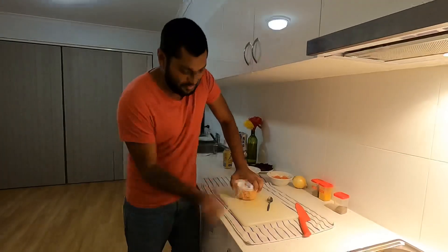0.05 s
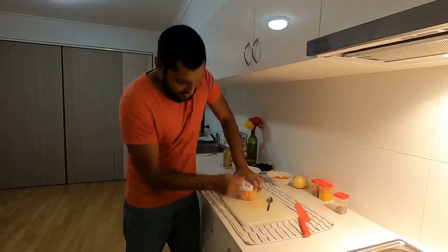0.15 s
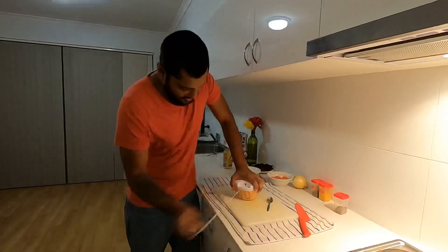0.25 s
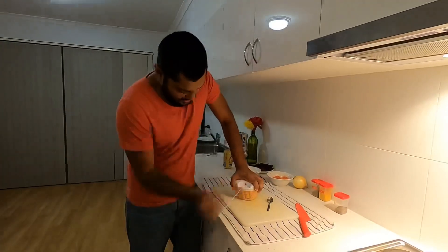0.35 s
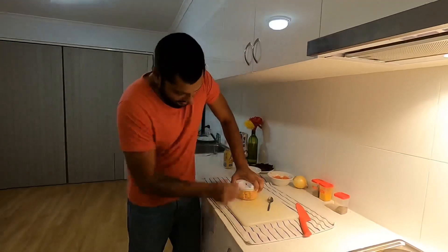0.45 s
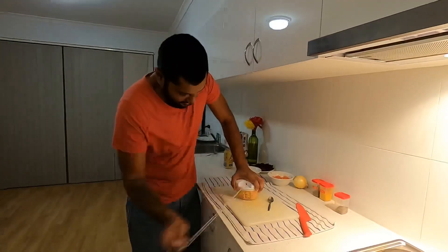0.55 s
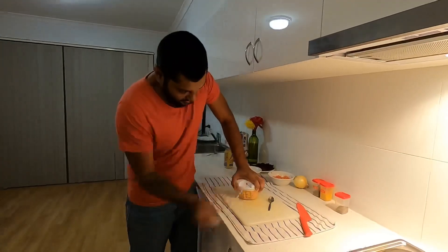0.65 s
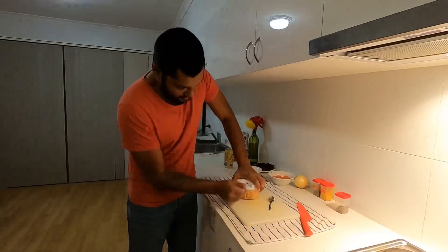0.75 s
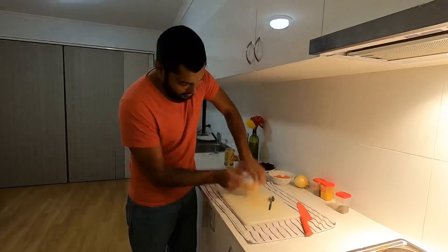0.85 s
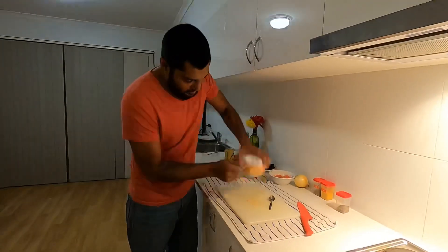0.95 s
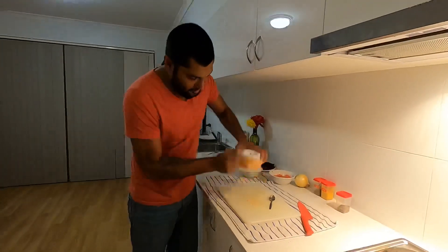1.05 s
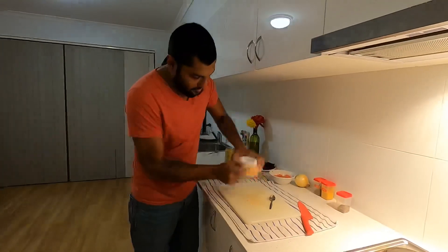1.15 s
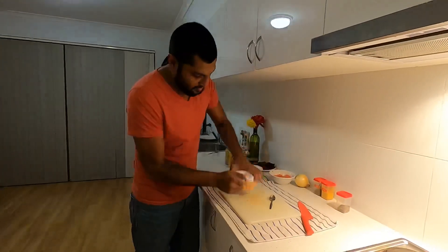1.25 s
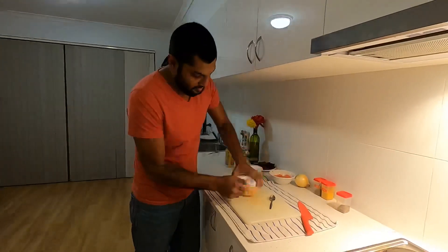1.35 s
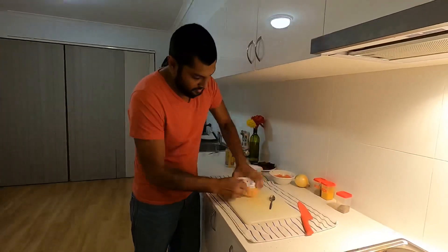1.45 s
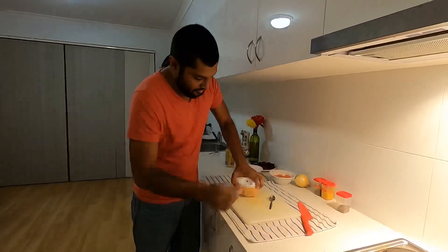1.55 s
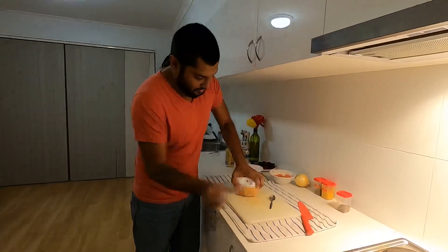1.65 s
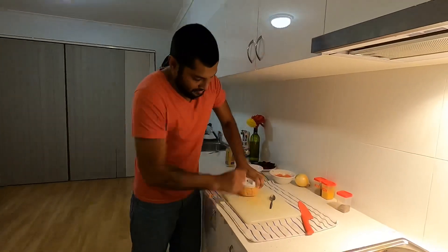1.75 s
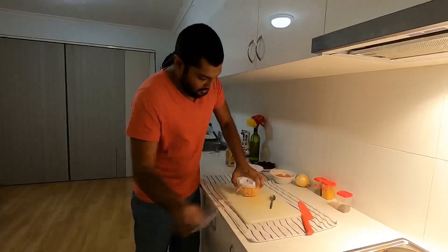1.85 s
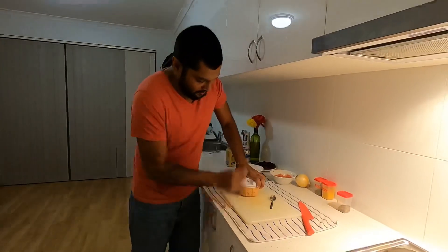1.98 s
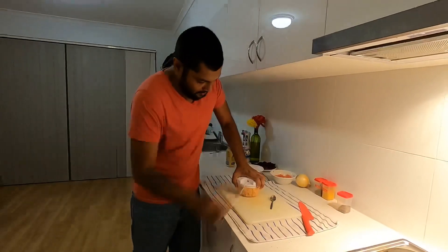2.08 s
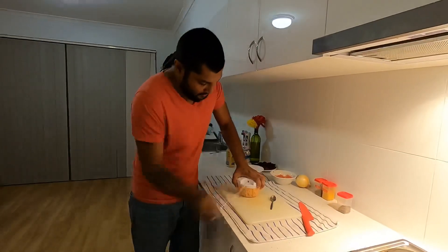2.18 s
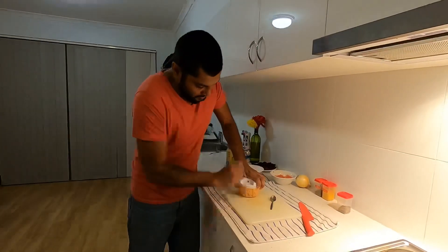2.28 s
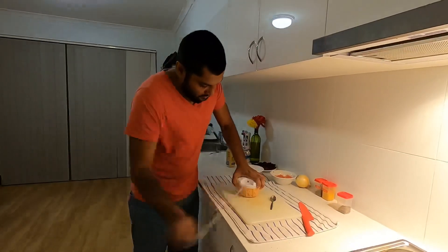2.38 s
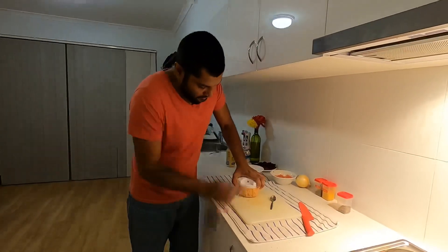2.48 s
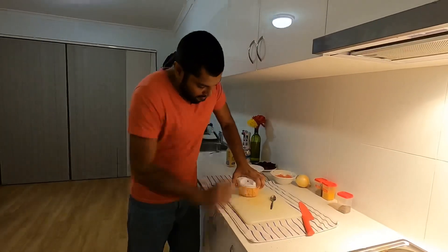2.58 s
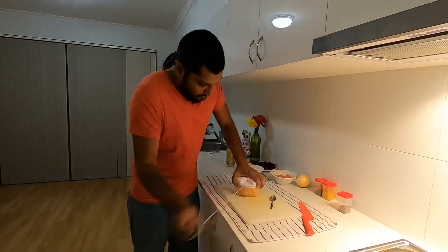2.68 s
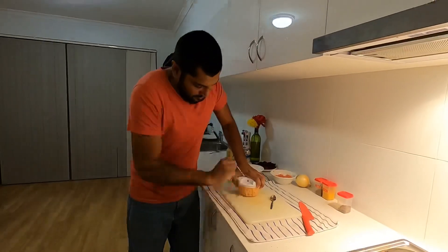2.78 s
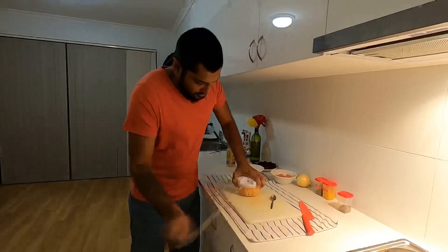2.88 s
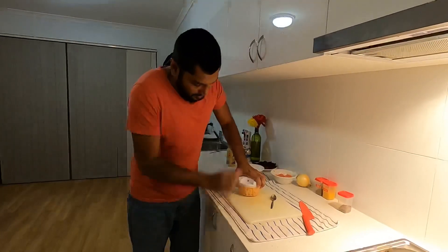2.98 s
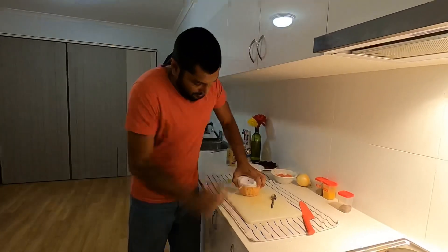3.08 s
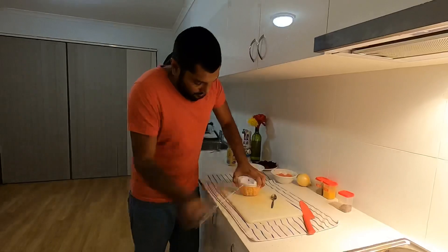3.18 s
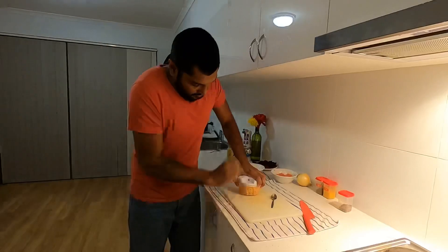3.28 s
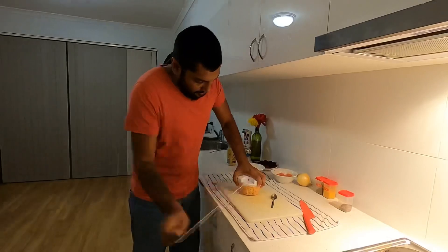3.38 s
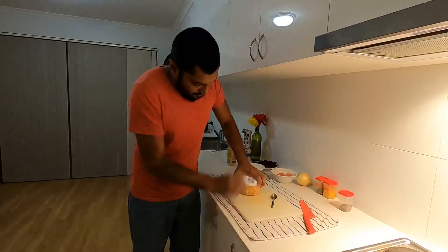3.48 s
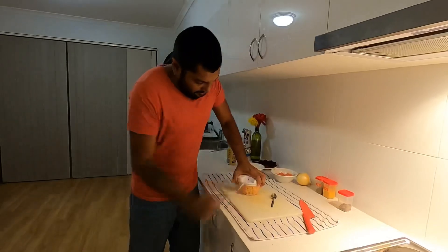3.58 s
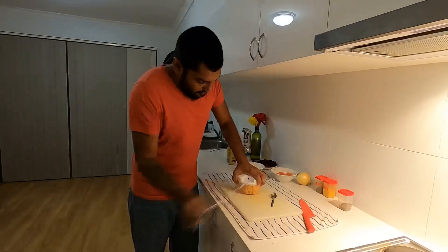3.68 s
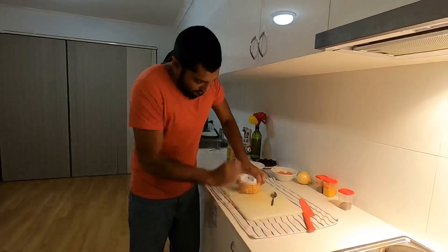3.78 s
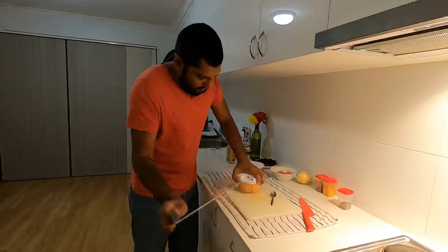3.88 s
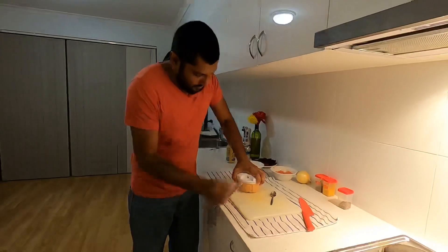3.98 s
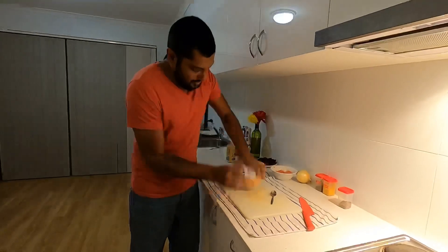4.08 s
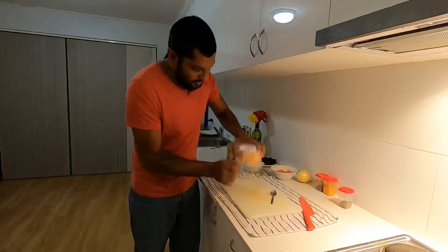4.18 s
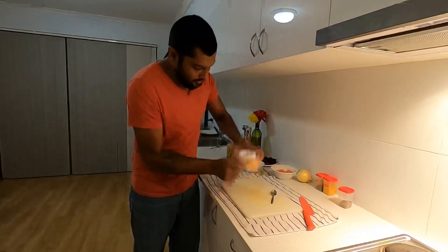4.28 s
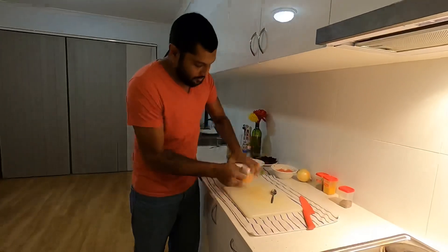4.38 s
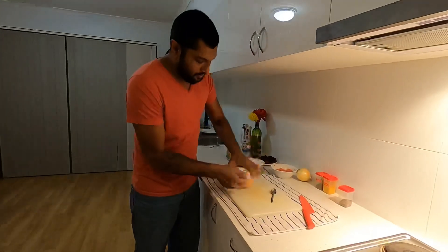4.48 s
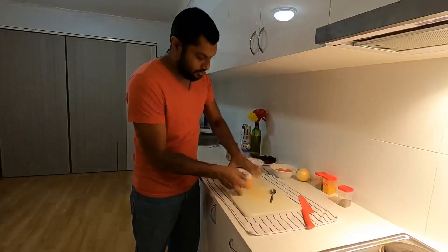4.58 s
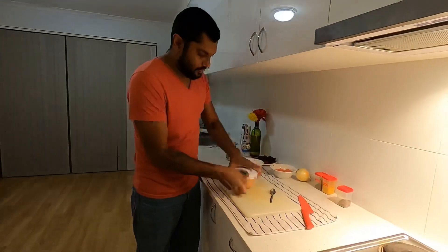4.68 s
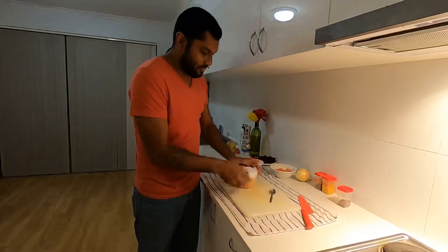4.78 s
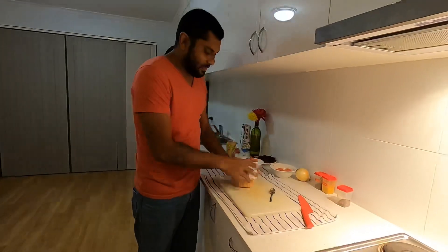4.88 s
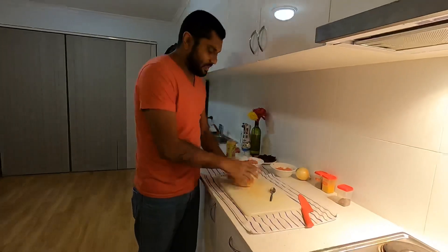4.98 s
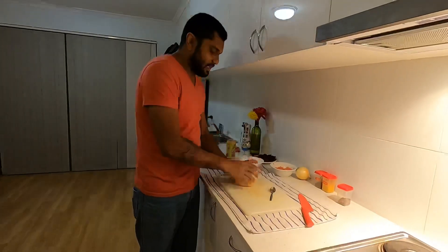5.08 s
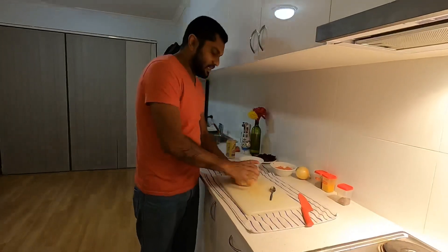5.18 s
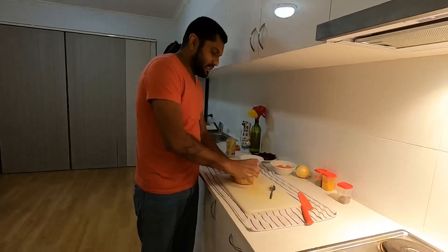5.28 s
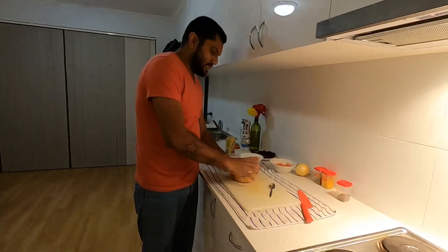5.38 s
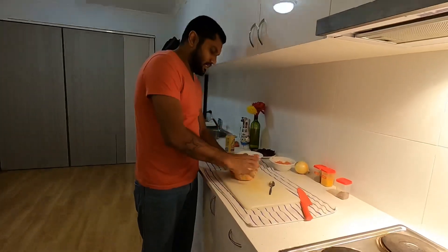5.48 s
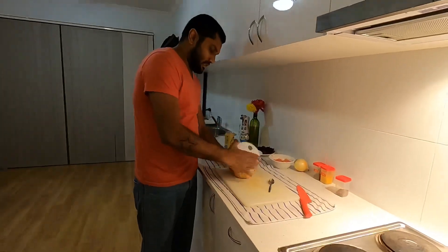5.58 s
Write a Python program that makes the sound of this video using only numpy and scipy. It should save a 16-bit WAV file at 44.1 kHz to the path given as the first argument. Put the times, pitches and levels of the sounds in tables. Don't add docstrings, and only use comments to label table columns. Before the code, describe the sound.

In a small hard kitchen, a pull-cord food chopper is yanked three times, its gears rasping and ratchet clattering. The bowl is shaken and set down, then about ten fast pulls follow at four per second. After another shake, it lands with a hard knock, the lid snaps, and faint rubbing remains. Stereo microphone about two metres away, short bright reverberation.

```python
import sys
import numpy as np
from scipy import signal
from scipy.fft import rfft, irfft, next_fast_len
from scipy.io import wavfile
from scipy.ndimage import uniform_filter1d

SR = 44100
rng = np.random.default_rng(int(sys.argv[2]) if len(sys.argv) > 2 else 0)


def dump_mix(stems):
    frames = np.atleast_2d(stems).T
    limited = np.clip(frames, -1, 1)
    pcm = np.round(limited * 32767).astype(np.int16)
    wavfile.write(sys.argv[1], SR, pcm)


def natural_amplitude(level_db):
    exponent = np.asarray(level_db, float) / 20
    return 10 ** exponent


N = 248879
T = np.arange(N) / SR
LONG = next_fast_len(N)


def on_log(hz, table):
    f, value = np.transpose(table)
    return np.interp(np.log(np.maximum(hz, 1)), np.log(f), value)


def ring(x, spectrum, modes=()):
    hz = np.arange(4097) * SR / 8192
    db = on_log(hz, spectrum)
    for f, width, lift in modes:
        db = db + lift / (1 + (2 * (hz - f) / width) ** 2)
    cepstrum = irfft(db * np.log(10) / 20)
    cepstrum[1:4096] *= 2
    cepstrum[4097:] = 0
    response = irfft(np.exp(rfft(cepstrum)))[:4096]
    return signal.fftconvolve(x, response / np.sqrt(np.sum(response ** 2)))[:N]


def band(x, lo_hz, hi_hz):
    return signal.sosfilt(signal.butter(2, [lo_hz, hi_hz], "bandpass", fs=SR, output="sos"), x)


def curve(spans, column):
    total = 0
    for span in spans:
        columns = np.transpose(span)
        total = total + natural_amplitude(np.interp(T, columns[0], columns[column], -150, -150))
    return total


def clicks(rate, scatter_db):
    hit, size, sign = rng.random((3, N))
    size_db = np.minimum(-scatter_db * np.log(1 - size), 11.0)
    x = (hit < rate / SR) * natural_amplitude(size_db) * np.sign(sign - .5)
    return x / np.sqrt(np.mean(x ** 2))


def strokes(start, db, rise_s, hold_s, fall_s):
    out = np.zeros(N + 2 * SR)
    u = np.arange(SR // 2) / SR
    for s, level, rise, hold, fall in np.broadcast(start, db, rise_s, hold_s, fall_s):
        i = int((s + 1) * SR)
        swell = np.clip(u / max(rise, .002), 0, 1) ** 2
        out[i:i + len(u)] += natural_amplitude(level) * swell * np.exp(-u / 0.28 - np.maximum(u - hold, 0) / fall)
    return out[SR:N + SR]


# (pitch [Hz], correlation [-1 to 1])
LIKENESS = [(60, 0.88), (130, 0.93), (290, 0.96), (640, 0.76), (1410, 0.58), (3100, 0.14), (6800, -0.22),
            (15000, 0.0016)]


def diffuse(size):
    mid, side = rfft(rng.standard_normal((2, size)))
    c = np.clip(on_log(np.arange(len(mid)) * SR / size, LIKENESS), -.9, .999)
    a, b = np.sqrt((1 + c) / 2) * mid, np.sqrt((1 - c) / 2) * side
    return irfft([a + b, a - b], size)


def drift(hold_s):
    k = int(hold_s * SR)
    return 0.94 * uniform_filter1d(np.repeat(rng.standard_normal(N // k + 1), k), k)[:N]


# (time [s], clatter [dB], length [s], pawl catch after [s], catch level [dB])
REWINDS = [(-0.03, -13, 0.079, .034, -40), (0.194, -18, 0.021, 0.0078, -20),
           (0.236, -16.5, 0.13, .006, -15), (0.492, -15.5, 0.073, 0.032, -12),
           (0.562, -18.5, 0.11, 0.021, -14.5), (1.535, -13.5, 0.13, 0.093, -14.5),
           (1.822, -12, 0.13, .019, -12.5), (2.126, -12, 0.052, 0.018, -17.5),
           (2.385, -12, 0.082, .023, -26), (2.625, -12.5, 0.097, .023, -48),
           (2.866, -12.5, 0.11, 0.045, -28), (3.129, -12, 0.062, .012, -18.5),
           (3.363, -13, 0.092, .012, -39), (3.624, -12.5, 0.075, .015, -17), (3.861, -13, 0.052, .02, -25)]
# (time [s], gear rasp level [dB], drum whistle level [dB], board wobble level [dB])
YANKS = [(0.0716, -14.5, -25.5, -15), (0.373, -17, -26, -28), (0.67, -16, -30, -55),
         (1.6977, -17, -29, -47), (1.963, -14.5, -42, -22), (2.228, -16.5, -27, -32),
         (2.497, -15, -36, -23), (2.7473, -15, -30.5, -20), (2.9891, -15.5, -31.5, -22),
         (3.2332, -16, -29.5, -27), (3.487, -15.5, -27.5, -21.5), (3.746, -14, -32, -12.5),
         (3.973, -18, -39, -41)]
# (pitch [Hz], level [dB per Hz])
BOWL = [(88, -25), (150, -6), (436, -7), (656, -6), (766, -8), (985, -0.5), (1660, -3), (1800, -1.5),
        (8830, -23), (15500, -38.5)]
# (pitch [Hz], width [Hz], lift [dB])
BOWL_MODES = [(231.5, 38, 7.8), (325, 66, 7.8), (497, 15, 2.9), (657, 156, 9), (845, 42, 6.2),
              (1025, 70, 5.9), (1200, 17, 0.79), (1870, 150, 4.5), (2170, 460, 1.33)]
# (pitch [Hz], level [dB per Hz])
GEARS = [(1500, -23.5), (2500, -7), (3550, -13), (4500, -4), (5500, -14), (7000, -13), (9000, -10),
         (10000, -21), (12500, -21), (15500, -75)]
# (pitch [Hz], width [Hz], lift [dB])
GEAR_MODES = [(3880, 130, 4), (4570, 100, 1.8), (6440, 94, 6), (7700, 530, 3.5)]
# (low edge [Hz], high edge [Hz])
SHIFTING_BANDS = [(520, 870), (850, 1230), (1650, 2250), (2400, 3220)]


def chopper():
    yank, back = np.transpose(YANKS), np.transpose(REWINDS)
    blades_db, ratchet_db = -27, -5
    rewind_rise_s = 0.0052 + 0.59 * back[3]

    def pull(db, fall_s):
        return strokes(yank[0], db, 0.014, 0.059, fall_s)

    def wind(db, fall_s):
        return strokes(back[0], back[1] + db, rewind_rise_s, back[2], fall_s)

    chops = signal.lfilter([1], [1, -np.exp(-1 / (0.0097 * SR))], np.abs(clicks(110, 23.0)))
    lumps = 1.13 + 0.24 * chops / np.mean(chops)

    rasp = ring(pull(yank[1] - 11, 0.031) * lumps * clicks(7000, 1.7), GEARS, GEAR_MODES)
    whistle = pull(yank[2] - 3, 0.043) * squeal()

    clutch = strokes(yank[0] + 0.0042, yank[1] - 20, 0.0027, 0.028, .012)
    clutch_zip = clutch * band(clicks(6700, 2.0), 6300.0, 16000.0)

    load = pull(blades_db - 5.5, 0.082) + wind(-13, 0.035)
    load = load + strokes(yank[0], blades_db - 6.5, 0.044, 0.067, 0.036)
    clatter = ring(load * lumps * clicks(2500, 2.5), BOWL, BOWL_MODES)
    shifting = sum(.45 * drift(.035) * band(clatter, lo, hi) for lo, hi in SHIFTING_BANDS)

    ticks = wind(ratchet_db - 7, 0.023) * lumps * band(clicks(1300, 2.2), 3280.0, 4200.0)
    return rasp + whistle + clutch_zip + clatter + shifting + ticks


# (pitch [Hz], level [dB per Hz])
HUSH = [(20, 3), (40, 3), (150, -4.5), (320, -0.5), (800, -14), (2000, -9), (3500, -30), (7500, -27),
        (14000, -62)]


def hush():
    return natural_amplitude(-58) * np.array([ring(side, HUSH) for side in diffuse(LONG)])


# (time [s], level [dB])
PRESS = [
    [(0.0, -27.5), (0.1, -44), (0.2, -36), (0.27, -39), (0.8, -33), (1.0, -51), (1.15, -90)],
    [(1.58, -60), (1.68, -31.5), (2.05, -28.5), (2.12, -38), (2.23, -29), (2.62, -31.5), (2.77, -40.5),
     (3.5, -34), (4.05, -39.5), (4.14, -49), (4.4, -79)],
]
# (time [s], level [dB])
JOLTS = [
    (1.38, -54),
    (1.43, -39),
    (4.59, -47),
    (4.859, -45),
    (5.08, -62),
]
# (pitch [Hz], width [Hz])
WORKTOP_MODES = [(78, 12.2), (129, 36.7)]


def worktop():
    yank = np.transpose(YANKS)
    jolts = strokes(*np.transpose(JOLTS), 0.032, 0.038, 0.044)
    low = np.minimum(curve(PRESS, 1) + jolts, natural_amplitude(-25))
    wobble = strokes(yank[0], yank[3], 0.11, 0.046, 0.036) + natural_amplitude(-7.5) * low + natural_amplitude(-10) * jolts
    out = natural_amplitude(8.5) * uniform_filter1d(low, 9000) * band(rng.standard_normal(N), 19.0, 55.)
    for push, (hz, width) in zip((low, wobble), WORKTOP_MODES):
        mode = band(rng.standard_normal(N + SR), hz - width / 2, hz + width / 2)[SR:]
        out = out + push * mode / np.std(mode)
    return out


# (time [s], level [dB], then relative to it hollow [dB], shell [dB], rim [dB])
TOSSES = [
    (0.967, -23, -3, -3, 3.5),
    (1.027, -18, -3.5, -4.5, -10),
    (1.085, -31.5, -8, 10.5, 9.5),
    (1.101, -24, -13, -4, -1),
    (1.153, -25.5, -7, -5.5, -7),
    (1.265, -60, -28, -31.5, -19),
    (4.211, -21.5, -9, 0.5, 2),
    (4.267, -16, -3, 0, -7),
    (4.364, -34.5, -8, 7.5, 7),
    (4.378, -24.5, 1.5, -2, -0.5),
]
# (time [s], level [dB], thud [dB], hollow [dB], contact [s])
LANDINGS = [
    (1.425, -16, -7, -6, 0.007),
    (1.493, -24, -13, -11, 0.003),
    (4.586, -5.5, -12.5, -25, 0.0094),
    (4.606, -35.5, 14, -13, 0.026),
]
# (time [s], level [dB], hollow [dB], shell [dB], rim [dB])
SNAPS = [(1.528, -24, -11, 6, 6.5), (3.712, -12.5, -33, -11, 3.5), (4.706, -19.5, -2, -4, -20),
         (4.714, -19, 0.5, -2, 1), (4.751, -12, -21, -7, 4.5), (4.766, -8, -31, -9, 3),
         (4.781, -19, -21, -17.5, -1), (5.182, -44.5, -12, -2, 5), (5.361, -49, 2, -22, -2),
         (5.521, -37.5, -1, -9, -26), (5.55, -44, -3, -20, -30), (5.578, -43, 0, -20, -30)]
# (pitch [Hz], level [dB per Hz])
BOARD = [(100, -18.5), (230, 0), (600, 8), (1200, 0.5), (2000, -10), (2500, -26.5), (4600, -41),
         (9000, -43)]
# (pitch [Hz], width [Hz], lift [dB])
BOARD_MODES = [(250, 32, 9.2), (321.3, 3.6, 28), (493.5, 5, 8.2), (1060, 79, 4.1), (1263, 30, 1.3)]
# (pitch [Hz], level [dB per Hz])
LID = [(120, -18), (200, -16.5), (271, -23), (1780, 3), (2020, 4.5), (2170, 3), (3560, -2.5), (5270, -22),
       (14000, -44)]
# (pitch [Hz], level [dB], time to fall 60 dB [s])
HOLLOW_MODES = [(666, 3.5, 0.042), (913, -18.5, 0.049), (1206, -17.5, 0.093), (2096, -9.5, 0.061),
                (2443, -9.5, 0.018), (3420, -12.5, 0.013)]


def knocks():
    # (time s, level dB, thud dB, shell dB, rim dB, hollow dB, contact s)
    rows = [(s, db, -14, shell, rim, hollow, .007) for s, db, hollow, shell, rim in TOSSES]
    rows += [(s, db, thud, -27, -20, hollow, contact) for s, db, thud, hollow, contact in LANDINGS]
    rows += [(s, db, -18, shell, rim, hollow, .004) for s, db, hollow, shell, rim in SNAPS]
    rows += [(s + after, db, -17, -8, -4, -10, .005) for s, _, _, after, db in REWINDS]

    push = np.zeros((5, N + 2000))
    u = np.arange(1500) / SR
    for s, db, *parts, contact in rows:
        chatter = rng.standard_normal(len(u))
        touch = 0.19 * np.exp(-u / 0.00037) + np.exp(-u / max(contact, .0005))
        burst = rfft(chatter * touch)
        burst = irfft(burst / np.abs(burst) ** 0.34) * np.exp(-u / 0.0086)
        burst = burst / np.sqrt(np.sum(burst ** 2))
        i = int(s * SR)
        push[:, i:i + len(u)] += natural_amplitude(db + np.array([0] + parts))[:, None] * burst

    board = band(ring(push[0, :N], BOARD, BOARD_MODES), 618.0, 1800.0)
    thud = band(ring(push[1, :N], BOARD, BOARD_MODES), 240.0, 710.0)
    shell = band(ring(push[2, :N], BOWL, BOWL_MODES), 2040.0, 3800.0)
    rim = band(ring(push[3, :N], LID, [(3790, 130, 2.0)]), 4480.0, 10000.0)
    v = T[:SR // 5]
    cup = sum(natural_amplitude(db - 60 * v / t60) * np.sin(2 * np.pi * hz * v) for hz, db, t60 in HOLLOW_MODES)
    hollow = band(signal.fftconvolve(push[4], cup)[:N], 435.0, 5000.)
    struck = natural_amplitude(18.5) * board + natural_amplitude(25.5) * thud + natural_amplitude(23) * shell + natural_amplitude(25) * rim
    return struck, natural_amplitude(-3.5) * hollow


def squeal():
    squeal_hz, drop_hz, width_hz = 4373, 295.7, 240
    start = np.transpose(YANKS)[0]
    since = T - start[np.maximum(np.searchsorted(start, T) - 1, 0)]
    hz = squeal_hz - drop_hz * np.sin(np.pi * np.clip(since / .1, 0, 1)) ** 2
    slow = signal.butter(2, width_hz / 2, fs=SR, output="sos")
    re, im = signal.sosfilt(slow, rng.standard_normal((2, N)))
    x = np.real((re + 1j * im) * np.exp(2j * np.pi * np.cumsum(hz) / SR))
    return x / np.std(x)


def bite():
    lid_fizz = (4.752, -18)  # (s, dB)
    s, db = np.transpose([row[:2] for row in YANKS] + [lid_fizz])
    return strokes(s + .003, db - 15, .004, .018, .008) * band(clicks(8000, 2.0), 13000., 16500.)


# (time [s], level [dB], brightness [dB], run-down [s])
SLIDES = [
    (0.97, -30, -4, 0.065),
    (1.029, -41, -8, 0.12),
    (1.429, -37, 6, 0.028),
    (1.524, -21, 5, 0.009),
    (4.215, -41, -5, 0.016),
    (4.267, -42, 0, 0.12),
    (4.712, -7, -12, 0.0052),
    (4.772, -23.5, 7.5, 0.079),
]
# (pitch [Hz], width [Hz], lift [dB])
LID_MODES = [(1125, 97, 9.1), (1580, 36, 2.2), (1910, 57, 5.6), (1950, 33, 11), (2700, 180, 4.8),
             (3770, 55, 5), (4500, 75, 9), (5200, 72, 4.4)]


def handling():
    twist_s, rise_s, hold_s, twist_fall_s = 5.014, 0.25, 0.37, 0.12
    twist_db, twist_bright_db = -40.5, 10.5
    slips = uniform_filter1d(np.repeat(rng.standard_normal(N // 900 + 1), 900), 900)[:N]
    grains = natural_amplitude(-7.0 + 0.73 * slips) * clicks(4000, 5.6)
    s, db, bright_db, fall_s = np.transpose(SLIDES)

    def slide(level_db):
        return ring(strokes(s, level_db, 0.018, 0.0047, fall_s) * grains, LID, [(2400, 510, 1.4)])

    since = T - twist_s
    grip = np.clip(0.15 + since / rise_s, 0, 1) * (since > 0)
    grip = grip * np.exp(-np.maximum(since - hold_s, 0) / twist_fall_s)
    twist = ring(natural_amplitude(twist_db - 3) * grip * grains, LID, LID_MODES)
    bright = band(slide(db + bright_db) + natural_amplitude(twist_bright_db) * twist, 4700.0, 11100.0)
    return slide(db) + twist + natural_amplitude(3.0) * bright


# (time [s], pitch [Hz], level [dB])
UNSEAL = [
    [(5.165, 270.8, -59), (5.19, 248.6, -54), (5.21, 320, -56), (5.225, 360, -64)],
    [(5.47, 598, -60), (5.515, 660, -50), (5.525, 710, -37), (5.54, 521, -39), (5.565, 326.3, -59),
     (5.59, 335, -47), (5.605, 369, -60), (5.64, 440, -57)],
]


def unseal():
    s, hz, _ = np.transpose(sum(UNSEAL, []))
    flutter = uniform_filter1d(rng.standard_normal((2, N)), size=300)
    flutter /= np.std(flutter)
    phase = 2 * np.pi * np.cumsum(np.interp(T, s, hz)) / SR + 1.2 * flutter[0]
    tone = np.sin(phase) + 0.12 * np.sin(1.9 * phase)
    return curve(UNSEAL, 2) * natural_amplitude(4 * flutter[1]) * tone


# (pitch [Hz], time to fall 60 dB [s])
ROOM_T60 = [(100, 0.78), (400, 0.5), (1500, 0.52), (5000, 0.51), (12000, 0.39)]
# (delay left [s], delay right [s], level [dB])
ECHOES = [
    (.0024, 0.0023, -15),
    (.0053, 0.005, -22),
    (.0089, 0.008, -32),
]


def kitchen(x):
    u = np.arange(int(.8 * SR)) / SR
    noise, tail = diffuse(len(u)), 0
    for hz in 40 * 2. ** np.arange(9):
        octave = band(noise, hz / np.sqrt(2), hz * np.sqrt(2))
        tail = tail + octave * natural_amplitude(-60 * u / on_log(hz, ROOM_T60))
    tail = rfft(tail * np.clip((u - .003) / 0.0016, 0, 1))
    tail = irfft(tail / np.sqrt(uniform_filter1d(np.abs(tail) ** 2, size=70)))
    for left, right, db in ECHOES:
        tail[[0, 1], [int(left * SR), int(right * SR)]] += natural_amplitude(db)
    return signal.fftconvolve(x[None], tail, axes=1)[:, :N]


def scene():
    struck, hollow = knocks()
    around = chopper() + struck + handling()
    forward = hollow + unseal() + bite()
    near = around + forward

    delay = np.exp(-2j * np.pi * np.arange(LONG // 2 + 1) * 1.23 / LONG)
    late = irfft(rfft(near, LONG) * delay, LONG)[:N]
    direct = np.array([natural_amplitude(-0.8) * late, near])

    loudness = uniform_filter1d(np.abs(near), 4000) * 1e3
    unlike = natural_amplitude(-68.5) * band(rng.standard_normal(N), 40., 110.0) * loudness
    low = worktop() + unlike * np.array([[1], [-1]])

    room = kitchen(around + natural_amplitude(-12) * forward)
    return natural_amplitude(1.5) * direct + natural_amplitude(0.5) * room + low + hush()


def roll_off(x):
    return signal.sosfilt(signal.butter(12, 15690, fs=SR, output="sos"), x)


def record(dry):
    limited = np.tanh(1.555 * dry) / 1.7
    mic = signal.butter(2, 13000, fs=SR, output="sos")
    top = signal.ellip(8, .2, 70, 15700, fs=SR, output="sos")
    heard = signal.sosfilt(np.vstack([mic, top]), limited)
    return roll_off(heard)


dry = scene()
out = record(dry)
dump_mix(out)
```